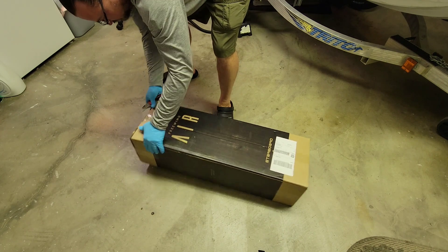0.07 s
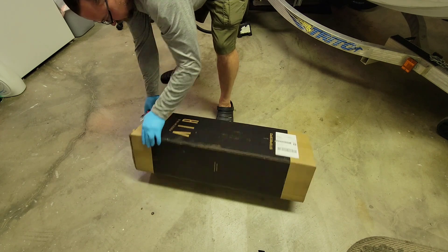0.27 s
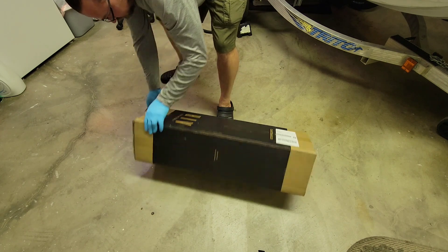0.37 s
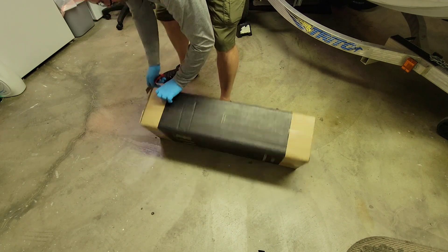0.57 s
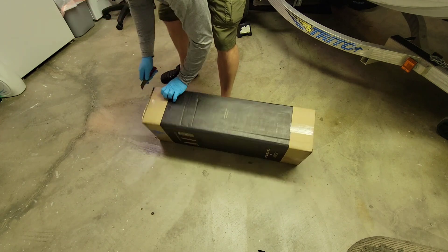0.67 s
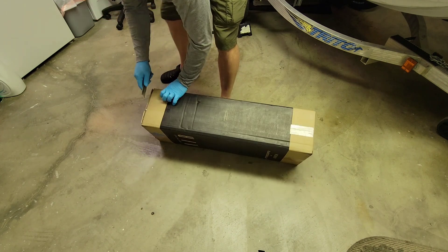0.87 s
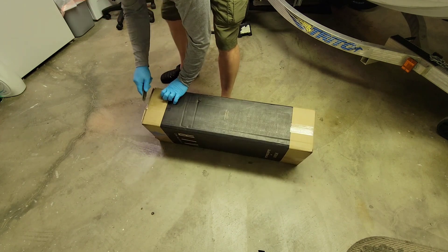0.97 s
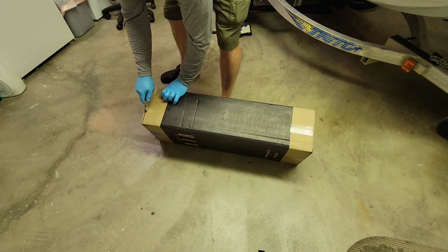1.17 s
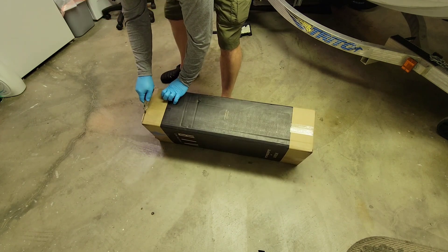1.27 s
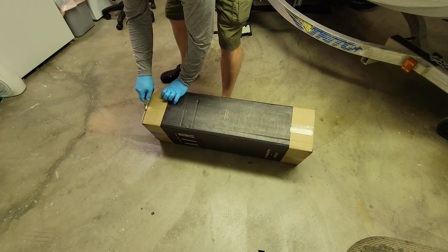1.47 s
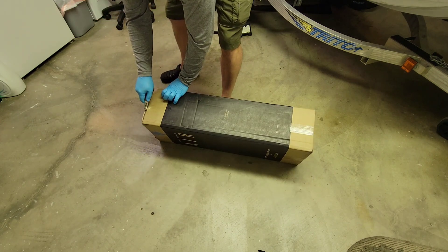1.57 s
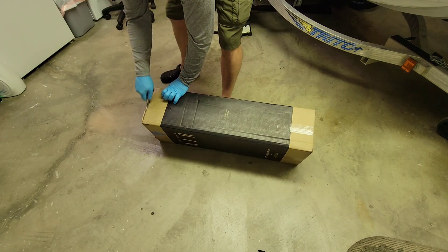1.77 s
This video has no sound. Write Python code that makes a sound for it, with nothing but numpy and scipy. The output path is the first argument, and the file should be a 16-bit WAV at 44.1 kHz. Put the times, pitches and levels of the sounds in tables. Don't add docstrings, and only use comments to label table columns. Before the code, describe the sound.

A cardboard box knocks and scrapes on concrete from the start, then its long face slaps down loudly at 0.22 seconds with a hollow boom and short room echo. It slides grittily until about 0.5, rocks and settles with a thud near 0.7. Soft gloved taps come at 1.1 to 1.25, faint rubbing from 1.45, then a blade jerks sharply through tape at 1.7 to 1.8, over faint hum.

```python
import sys
import numpy as np
from scipy import signal
from scipy.fft import rfft, irfft, next_fast_len
from scipy.io import wavfile
from scipy.ndimage import map_coordinates

SR = 44100
rng = np.random.default_rng(int(sys.argv[2]) if len(sys.argv) > 2 else 0)


def volts_from_db(level):
    exponent = np.asarray(level, float) / 20
    return 10 ** exponent


def waveform_to_disk(signal):
    frames = np.transpose(np.atleast_2d(signal))
    scaled = np.clip(frames, -1, 1) * 32767
    samples = np.round(scaled).astype(np.int16)
    wavfile.write(sys.argv[1], SR, samples)


N = 79380


def unit(x):
    return x / np.sqrt(np.mean(x ** 2) + 1e-20)


def along(points, hz):
    f, value = np.transpose(points)
    return np.interp(np.log(hz + 1), np.log(f + 1), value)


def filtered(x, response):
    m = next_fast_len(x.shape[-1] + 8192)
    spectrum = rfft(x, m) * response(np.fft.rfftfreq(m, 1 / SR))
    return irfft(spectrum, m)[..., :x.shape[-1]]


# (frequency [Hz], left-right likeness [-1..1])
LIKENESS = [(60, .93), (130, .95), (290, .45), (640, -.1), (1410, -.3), (3100, -.2), (6820, -.03),
            (15000, 0)]


def diffuse(pair):
    def mid_side(hz):
        angle = np.arccos(np.clip(along(LIKENESS, hz), -1, 1)) / 2
        return np.array([np.cos(angle), np.sin(angle)])

    mid, side = filtered(pair, mid_side)
    return np.array([mid + side, mid - side])


def near(x):
    lead_s = 0.00018
    sides = np.array([[1], [-1]])
    return filtered(x, lambda hz: np.exp(1j * np.pi * hz * lead_s * sides))


def stroke(rows):
    s, level_db, *others = np.transpose(rows)
    t = np.arange(N) / SR
    level = volts_from_db(np.interp(t, s, level_db, left=-120, right=-120))
    return [level] + [volts_from_db(np.interp(t, s, db)) for db in others]


def grains(response):
    grains_per_s, spread_db = 2100, 2.5
    struck = rng.random(N) < grains_per_s / SR
    sizes = struck * volts_from_db(spread_db * np.minimum(rng.exponential(1, N), 3))
    noise = rng.standard_normal((2, N)) * (1.9 + sizes)
    return unit(diffuse(filtered(noise, response)))


# (frequency [Hz], level [dB])
LAMP_HUM = [(240, -84), (360, -80), (480, -80), (600, -80), (720, -80), (840, -86)]
# (frequency [Hz], density [dB per Hz])
AIR_COLOUR = [(25, -5.5), (70, -4), (200, -11), (600, -18.5), (1200, -23.5), (3000, -29.5), (7000, -38),
              (15700, -44.5)]


def hush():
    t = np.arange(N) / SR
    hum = sum(volts_from_db(db) * np.sin(2 * np.pi * hz * t + 6 * rng.random((2, 1))) for hz, db in LAMP_HUM)
    noise = filtered(rng.standard_normal((2, N)), lambda hz: volts_from_db(along(AIR_COLOUR, hz)))
    return hum + volts_from_db(-62.5) * unit(diffuse(noise))


# (time [s], grit level [dB], panel share [dB])
DRAG_STROKES = [
    [(0, -43.5, -20.5), (.022, -47, -30.5), (.084, -43, 0), (.166, -56, 2), (.2, -47, 8)],
    [(.235, -43, 10), (.29, -48, 8), (.33, -42.5, 8), (.376, -40, 12), (.416, -36, 6), (.455, -41.5, 10),
     (.506, -53, -3.5), (.56, -54.5, 10)],
    [(.62, -44, 2.5), (.68, -52.5, 12.5), (.712, -36.5, -2.5), (.842, -72.5, 12.5), (.9, -73, -4)],
]
# (frequency [Hz], density [dB per Hz])
GRIT_COLOUR = [(180, -47.5), (320, -4.5), (700, 0.5), (1600, 3), (3500, -0.5), (6800, -3.5), (10000, -3.5),
               (15700, -11)]
# (frequency [Hz], width [Hz], level [dB])
SUNG_PANELS = [(517.4, 210, -3), (867, 150, -2.5), (1212, 88, -4), (1573.6, 46, -4)]
# (time [s], level [dB])
DUST_LEVEL = [(.03, -71), (.085, -48.5), (.14, -69), (.30, -60), (.36, -48.5), (.42, -40), (.47, -50),
              (.5, -70.5)]
# (frequency [Hz], density [dB per Hz])
DUST_COLOUR = [(3500, -30), (5200, -5), (6800, 4.5), (8500, -9.5), (11000, -9), (13500, -1.5),
               (15700, -9.5)]


def drag():
    def panels(f):
        total = 0
        for k, (centre, width, db) in enumerate(SUNG_PANELS):
            damping = 1j * f * width
            total = total + (-1) ** k * volts_from_db(db) * damping / (centre * centre - f * f + damping)
        return total

    hiss = stroke(DUST_LEVEL)[0] * grains(lambda hz: volts_from_db(along(DUST_COLOUR, hz)))
    level, share = stroke(sum(DRAG_STROKES, []))
    grit = grains(lambda hz: volts_from_db(along(GRIT_COLOUR, hz)))
    return hiss + level * (grit + volts_from_db(-10.5) * share * grains(panels))


# (time [s], slap level [dB], contact pitch [Hz], body level [dB], boom level [dB])
BOX_BLOWS = [(.001, -34.5, 274, -38.5, -60), (0.042, -45, 280, -49, -72.5), (.122, -48.5, 278, -52.5, -60),
             (0.192, -58, 379, -48, -70), (.212, -63, 605, -30.5, -62.5), (.228, -20.5, 532, -24, -41.5),
             (0.2347, -19, 272.4, -27.5, -44.5), (0.2438, -21.5, 349.4, -29.5, -37.5),
             (0.2533, -20.5, 207.1, -25.5, -42.5), (0.347, -59, 211, -38.5, -68),
             (.572, -49.5, 472, -36, -51), (0.583, -41.5, 354, -36, -47), (.597, -62, 300, -36, -46.5),
             (.625, -58.5, 460, -38.5, -55.5), (0.687, -39.5, 395, -35.5, -54.5),
             (0.6936, -33, 337, -46.5, -53.5), (0.709, -52, 334.6, -32, -35.5),
             (0.7126, -28, 350, -37.5, -39.5), (.728, -24.5, 188.6, -33, -60),
             (0.749, -45.5, 296, -35.5, -56), (0.874, -58, 472, -54, -64)]
FACE_SLAM = [
    (.2199, -7, 670, -26, -40),
    (.2225, -24, 330, -25, -40),
]
HAND_TAPS = [
    (1.114, -46.5, 444.4, -44, -59),
    (1.143, -43.5, 227.4, -46.5, -80.5),
    (1.2377, -52.5, 796, -53, -75.5),
    (1.563, -71, 593, -50, -87.5),
    (1.603, -60, 330, -57, -76.5),
    (1.734, -56.5, 198, -60, -79),
    (1.769, -46, 310, -43.5, -78),
]
# (frequency [Hz], level [dB], time to 60 dB down [s])
PANEL_MODES = [(165, -6, 0.07), (201.2, -2, 0.08), (239, 6, 0.035), (290, 0, .06), (352.3, -1, 0.09),
               (460, -0.5, 0.04), (550, -1, 0.07), (724, -10, 0.07), (777, 0, 0.045), (929, -10, .05),
               (1180, -14, 0.05), (1377, -12, 0.04)]
# (frequency [Hz], level [dB], time to 60 dB down [s])
SLAB_BOOMS = [(50.3, -6, 0.12), (72.1, 6, 0.06), (120, 0, .05)]


def blows():
    settle, sag, peak_cycles = .7, 1.0, .7
    ring_db, spread_oct, scatter_db = -10, 1.0, 2.5
    rattle_db, rattle_t60, rattle_top = 1, 0.1083, 1.575
    t = np.arange(SR // 2) / SR
    out = np.zeros(N + SR)
    boom_rise = 1 - np.exp(-t / 0.0041)
    body_rise = 1 - np.exp(-t / 0.0023)
    for s, slap_db, hz, body_db, boom_db in BOX_BLOWS + FACE_SLAM + HAND_TAPS:
        turns = t * hz * settle
        early = turns / peak_cycles
        swing = -np.sin(2 * np.pi * (turns + sag * (1 - np.exp(-turns))))
        slap = swing * early * np.exp(.5 - early ** 2 / 2)

        ring = 0
        sizes, phases = rng.standard_normal((2, len(PANEL_MODES)))
        for (f, db, t60), size, phase in zip(PANEL_MODES, sizes, phases):
            detuned_db = 4.1 * (np.log2(f / hz) / spread_oct) ** 2
            level = volts_from_db(db + scatter_db * size - detuned_db - 60 * t / t60)
            ring = ring + level * np.sin(2 * np.pi * f * t + phase)

        noise = filtered(rng.standard_normal(len(t)),
                         lambda f: f / (f + 110) / (1 + (f / hz / rattle_top) ** 2))
        rattle = unit(noise) * volts_from_db(rattle_db - 60 * t / rattle_t60)
        body = (volts_from_db(ring_db) * ring + rattle) * body_rise

        boom = sum(volts_from_db(db - 60 * t / t60) * np.sin(2 * np.pi * f * t) for f, db, t60 in SLAB_BOOMS)
        contact = volts_from_db(slap_db) * slap + volts_from_db(body_db) * body + volts_from_db(boom_db) * boom * boom_rise
        out[round(s * SR):][:len(t)] += contact
    return near(out[:N])


# (time
# [s], frequency [Hz], level [dB], rise [s], time to 60 dB down [s], its sign is idle)
RINGING_TONES = [(.001, 272.1, -47, 0.0051, 0.247), (0.224, 140.5, -31, 0.0073, 0.1077),
                 (0.228, 76.2, -30.5, .008, 0.0025), (.27, 49.72, -44, .02, 0.4339),
                 (0.245, 193.7, -25, 0.0099, 0.0968), (.262, 362.4, -33, 0.0058, -0.1029),
                 (.345, 209.1, -38, 0.003, 0.15), (.575, 70.8, -37.5, 0.0092, 0.3273),
                 (.578, 442.3, -44.5, 0.0052, -0.029), (.702, 349.7, -29.5, 0.004, 0.0193),
                 (.706, 121.8, -31, 0.0052, 0.1248), (0.71, 62.8, -29.5, 0.0038, 0.0439),
                 (.735, 180.7, -43.5, 0.0048, 0.0756), (.738, 358.7, -41, 0.0048, 0.2226),
                 (.752, 53.53, -39.5, 0.0087, 0.1857), (.82, 52, -51.5, 0.016, 0.43),
                 (.71, 799, -41.5, 0.0026, 0.132), (.77, 568.6, -54, 0.0085, 0.197),
                 (.79, 180, -52.5, 0.0064, 0.2152), (1.115, 584.4, -49, .002, 0.085),
                 (1.116, 213.6, -47, 0.0029, -0.033), (1.2414, 235, -43, 0.0012, 0.0214),
                 (1.736, 198.6, -53.5, .006, -0.76), (1.77, 219.3, -42.5, 0.005, -0.5)]


def hums():
    shake_db, shakes_per_s = 3.5, 70
    t = np.arange(SR // 2) / SR
    out = np.zeros(N + SR)
    for s, hz, db, rise, t60 in RINGING_TONES:
        shake = map_coordinates(rng.standard_normal(shakes_per_s), [t * shakes_per_s])
        level = volts_from_db(db + shake_db * shake - 60 * (t / t60) ** 2)
        swell = 1 - np.exp(-(t / rise) ** 2)
        out[round(s * SR):][:len(t)] += level * swell * np.sin(2 * np.pi * hz * t)
    return near(out[:N])


# (frequency [Hz], time to 60 dB down [s])
GARAGE_DECAY = [(80, 0.24), (200, 0.4), (500, 0.33), (3000, 0.396), (12000, 0.19)]


def garage(x):
    gap_s, dull_hz = 0.0067, 90
    hz, t, z = signal.stft(rng.standard_normal((2, SR * 3 // 4)), SR, nperseg=256)
    fade = volts_from_db(-60 * t / along(GARAGE_DECAY, hz)[:, None])
    tail = diffuse(signal.istft(z * fade, SR, nperseg=256)[1])
    tail = filtered(tail, lambda f: 1 / (1 + (dull_hz / (f + 1)) ** 2))
    tail = np.pad(tail / np.linalg.norm(tail[0]), ((0, 0), (round(gap_s * SR), 0)))
    return signal.fftconvolve(x[None], tail, axes=1)[:, :N]


# (time [s], level [dB], centre [Hz], width [octaves], time to 60 dB down [s])
SCUFF_BURSTS = [(.220, -33, 4560, 1.4, 0.089), (0.228, -37, 5000, 2.6, 0.063),
                (0.535, -44.5, 6670, 0.79, 0.069), (0.599, -45.5, 3430, 0.69, 0.357),
                (0.688, -44.5, 6000, 2.6, 0.112), (0.71, -40, 5000, 1.28, 0.09),
                (.872, -58, 5010, 0.91, 0.0765), (1.114, -57, 3989, 1.33, 0.3),
                (1.135, -54, 4990, 1.24, 0.094), (1.238, -62.5, 1470, 0.51, 0.03),
                (1.243, -56, 10020, 1.25, 0.077), (1.467, -52, 5948, 0.8, 0.0097),
                (1.486, -61, 5600, 0.348, 0.027), (1.563, -59, 2544, 0.13, 0.1),
                (1.565, -61.5, 3334, 0.0787, 0.084), (1.603, -78.5, 12900, 0.29, 0.042),
                (1.689, -67, 9500, 0.32, .015), (1.760, -33, 11400, 1.6, 0.0163),
                (1.771, -40.5, 1976, 1.12, 0.158), (1.7968, -22.5, 7010, 2.45, 0.0085),
                (1.1135, -51, 8952, 1.55, 0.0091), (1.135, -46, 8000, 1.35, .012),
                (.2200, -25.5, 1499, 0.54, 0.04), (.235, -40.5, 3001, 0.4, 0.119),
                (.308, -47, 11890, 1.2, 0.023)]


def scuffs():
    t = np.arange(SR // 4) / SR
    out = np.zeros((2, N + SR))
    rise = 1 - np.exp(-t / 0.00031)
    for s, db, hz, width, t60 in SCUFF_BURSTS:
        noise = filtered(rng.standard_normal((2, len(t))),
                         lambda f: volts_from_db(-6 * (np.log2((f + 1) / hz) / width) ** 2))
        out[:, round(s * SR):][:, :len(t)] += unit(diffuse(noise)) * volts_from_db(db - 60 * t / t60) * rise
    return out[:, :N]


# (time [s], level [dB])
GLOVE_RUB = [(1.44, -102.5), (1.468, -68), (1.55, -72), (1.57, -64), (1.69, -73)]
# (time [s], level [dB])
BLADE_CUT = [(1.69, -64), (1.700, -62.5), (1.704, -53), (1.745, -47.5), (1.760, -45.5), (1.785, -38),
             (1.81, -45.5)]
# (frequency [Hz], density [dB per Hz])
SLIT_COLOUR = [(180, -45.5), (400, -1), (1200, 3), (2500, 8.5), (6000, 2), (10000, 1.5), (15700, -9)]


def cut():
    catch_db, catches_per_s, glove_top_hz = 2.2, 400, 8780
    knots = rng.standard_normal(int(N * catches_per_s / SR) + 4)
    jerks = map_coordinates(knots, [np.arange(N) * catches_per_s / SR])
    slit = grains(lambda hz: volts_from_db(along(SLIT_COLOUR, hz)))
    blade = stroke(BLADE_CUT)[0] * volts_from_db(catch_db * jerks) * slit
    rub = grains(lambda hz: volts_from_db(along(GRIT_COLOUR, hz)) / (1 + (hz / glove_top_hz) ** 2))
    return blade + stroke(GLOVE_RUB)[0] * rub


# (time [s], left over centre [dB])
BOX_PAN = [(0, 1.7), (.224, 1.6), (.232, -.3), (1.5, -.3), (1.75, 1.1)]


def scene():
    box = blows() + hums() + scuffs() + drag() + cut()
    pan_db = -0.45 + np.interp(np.arange(N) / SR, *np.transpose(BOX_PAN))
    wet = volts_from_db(-7) * garage(box[0])
    return (box + wet) * volts_from_db([pan_db, -pan_db]) + hush()


def top_cut(x):
    return signal.sosfilt(signal.butter(12, 15830, fs=SR, output="sos"), x)


# (frequency [Hz], gain [dB])
MIC_COLOUR = [(20, -7.5), (45, -2.5), (4500, 0.5), (7600, 3.5), (8400, -4), (11500, -5.5), (12000, -0.5),
              (15700, 1.5)]


def record(dry):
    top_hz = 15830
    mix = filtered(dry, lambda hz: volts_from_db(along(MIC_COLOUR, hz)) * (hz < top_hz))
    return top_cut(mix)


dry = scene()
out = record(dry)
waveform_to_disk(out)
```